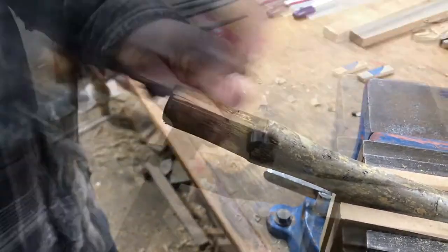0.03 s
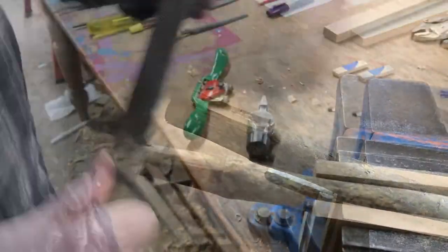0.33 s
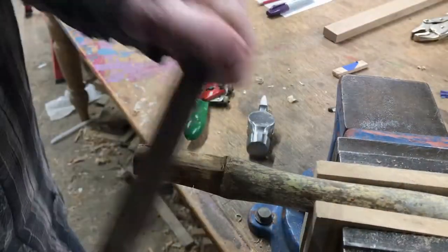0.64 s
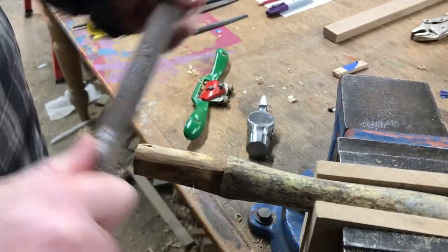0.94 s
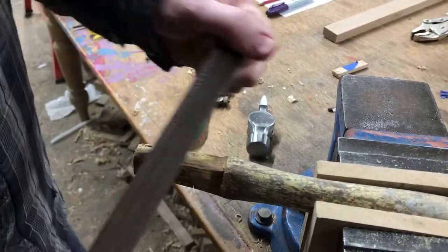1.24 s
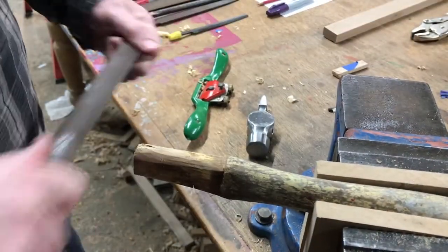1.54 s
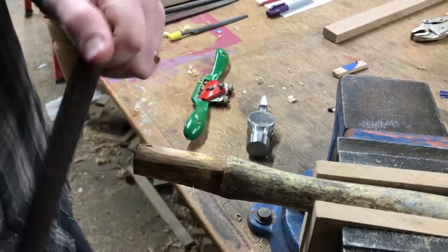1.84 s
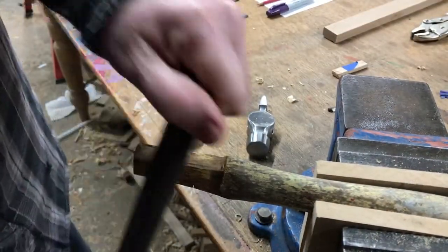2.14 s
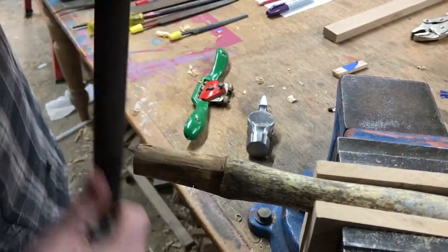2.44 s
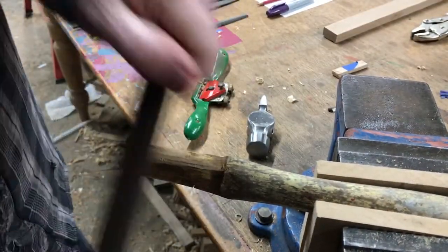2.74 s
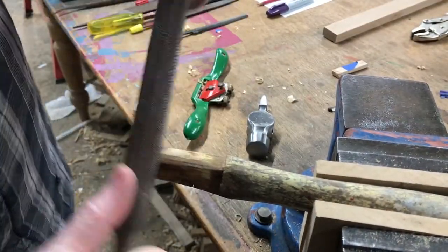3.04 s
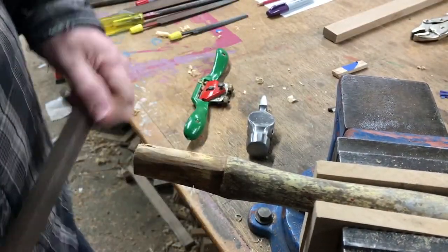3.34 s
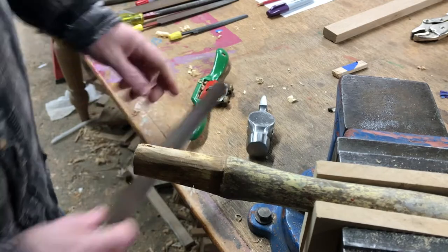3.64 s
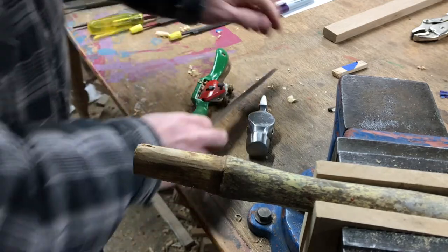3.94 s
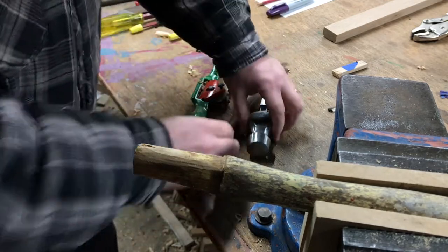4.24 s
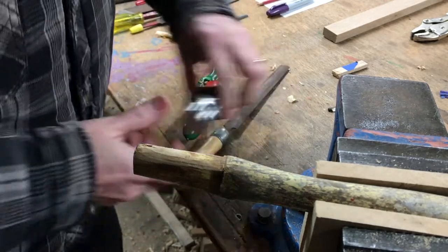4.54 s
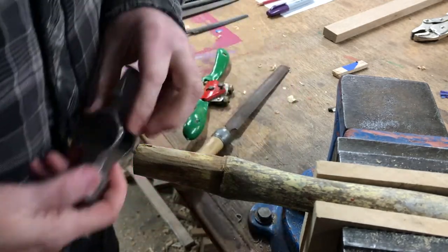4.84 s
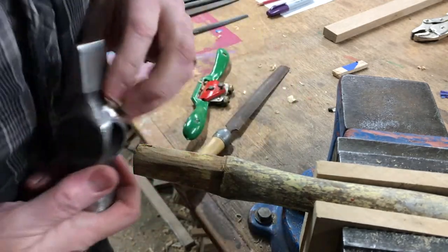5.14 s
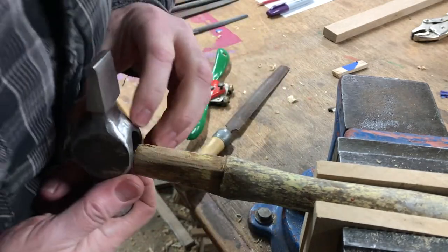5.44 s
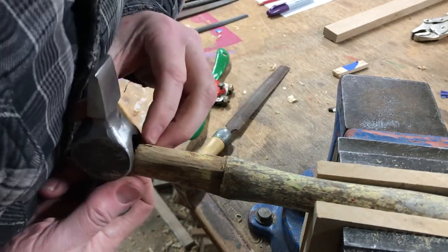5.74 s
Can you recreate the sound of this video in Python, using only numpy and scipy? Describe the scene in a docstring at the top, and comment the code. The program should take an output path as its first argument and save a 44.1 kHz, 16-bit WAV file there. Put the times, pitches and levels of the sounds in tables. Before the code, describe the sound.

A steel file rasps across a wooden hammer handle held in a vise. There are five short, unevenly spaced strokes, each led in by a clack of steel on wood. The file is then dropped on the bench with a brief ringing clatter, a steel hammer head is dragged softly off the wood, and it meets the end of the handle with a hollow tock. Close mono microphone in a small workshop with a low hum.

```python
"""A hand file rasps over a wooden hammer handle in a vise: five strokes, each led in by a clack.
Its rows of teeth tear fibres and shake the wood. Then the file drops on the bench and rings,
and the steel head is dragged off the bench and tried on the handle with a hollow tock.
Small workshop with a low hum; one microphone close to the vise, mono."""
import sys
import numpy as np
from scipy import signal
from scipy.fft import rfft, irfft
from scipy.io import wavfile
from scipy.ndimage import uniform_filter1d

SR = 44100
rng = np.random.default_rng(int(sys.argv[2]) if len(sys.argv) > 2 else 0)


def inscribe(sig):
    """Save sig as 16-bit PCM at rate SR to the path in sys.argv[1].

    A 1-D sig is mono; a 2-D sig holds one channel per row.
    Samples are clipped to [-1, 1] before scaling.
    """
    pcm = np.round(np.clip(np.atleast_2d(sig).T, -1, 1) * 32767)
    wavfile.write(sys.argv[1], SR, pcm.astype(np.int16))


N = 260190
BENDING_HZ, BENDING_WIDTH_HZ, BENDING_T60_S = 360.3, 52, 0.11  # the clamped handle flexing

# The hand's pushes, one or two to a stroke: start_s, attack_s, length_s, hardest_share, level_db,
# swell_db, ease_db, bite_db, chatter_db, bending_db, top_teeth_per_s, fastest_share, spurt_s
# (shares are of length_s)
PUSHES = [ (0.0, 0.01, 0.035, 1, -51, -3, 15, 4.5, 0, -19, 850, 0.56, 0.082),
          (0.088, 0.18, 0.275, 0.77, -50.5, 10.5, 9, 12.5, 8.5, 0, 885, 0.26, 0.155),
          (0.728, 0.0073, 0.19, 0.73, -42.5, 9.5, 11, 14, 9.5, -4.5, 1030, 0.4, 0.062),
          (1.282, 0.006, 0.12, 0.55, -44, 6, 8, 15.5, 5.5, -1, 984, 0.33, 0.12),
          (2.276, 0.11, 0.122, 0.48, -46, 4.5, 6.5, 9.5, 10.5, 5.5, 830, 0.36, 0.12),
          (2.876, 0.098, 0.19, 0.51, -45, 2, 16, 11.5, 7.5, -2, 1010, 0.33, 0.16),
          (3.08, 0.072, 0.02, 0.6, -59, -0.5, -2, 11.5, 2.5, 2.5, 800, 0.5, 0.1), ]
def pushes(slow_teeth_per_s=490):
    """Pressure swells and eases as the hand spurts and slows; gives four gains and the tooth rate."""
    t = np.arange(N) / SR
    gains, teeth_per_s = np.zeros((4, N)), np.zeros(N)
    for (start_s, attack_s, length_s, hardest_share, level_db, swell_db, ease_db,
         bite_db, chatter_db, bending_db, top_teeth_per_s, fastest_share, spurt_s) in PUSHES:
        peak_s = start_s + hardest_share * length_s
        from_peak = np.interp(t, [start_s, peak_s, start_s + length_s], [1, 0, 1])
        pressure_db = -np.where(t < peak_s, swell_db, ease_db) * from_peak ** 0.61  # a sharp peak
        teeth_db = level_db + gate_db(start_s, length_s, attack_s, release_s=0.022)
        # the handle shakes on as the file lifts
        wood_db = level_db + gate_db(start_s, length_s + 0.0074, attack_s, release_s=0.077)
        gains += from_db([teeth_db + pressure_db,
                          teeth_db + bite_db + 1.25 * pressure_db,
                          wood_db + chatter_db + pressure_db,
                          wood_db + bending_db + pressure_db])
        spurt = np.exp(-((t - start_s - fastest_share * length_s) / spurt_s) ** 2)
        speed = slow_teeth_per_s + (top_teeth_per_s - slow_teeth_per_s) * spurt
        teeth_per_s = np.maximum(teeth_per_s, speed)
    return gains, teeth_per_s


# Fibres tearing, heard close up: frequency_hz, density_db
TEARING_SPECTRUM = [(1470, -31.5), (2500, -1), (2960, -10), (3180, -1.5), (4130, 0.5), (4420, -6),
                    (5580, -5), (7030, -12), (8590, -11.5), (9500, -17), (10300, -18), (14300, -10.5),
                    (15800, -22)]
# Narrow peaks in the rasp: pitch_hz, width_hz, level_db
RASP_PEAKS = [(2650, 61, -2.5), (3246, 67, -3.5), (4300, 400, -11), (4740, 180, -1), (5470, 47, 3.5),
              (5860, 43, -3), (6490, 80, -2.5), (7230, 240, -10.5), (9420, 96, -4.5)]
def rasp(tooth_phase):
    """Fibres snap as each row of teeth bites: the bright hiss of the file."""
    tearing = snags(per_s=7800, spread_db=6.5) * (1 + 0.5 * np.sin(tooth_phase))
    hiss = coloured(tearing, TEARING_SPECTRUM)
    peaks = from_db(-0.5) * through(snags(per_s=4500, spread_db=3.5), RASP_PEAKS)
    bright = cut(scattered(hiss + peaks, share_db=-5.5, t60_s=0.0295), 2300, "high", order=3)
    return bright / np.std(cut(bright, 6500, "high", order=6))  # the top treble sets the level


# Low resonances that the teeth set chattering: pitch_hz, width_hz, level_db
CHATTER_MODES = [(650, 100, 0), (722, 70, 2.5), (924, 65, 3)]
# The wood right under the teeth: pitch_hz, width_hz, level_db
BITE_MODES = [(1136, 31, 0.5), (1278, 180, -2.5), (1600, 120, -6), (1850, 63, 1.5), (2076, 210, -3),
              (2395, 60, -2), (2447, 72.6, -9.5)]
def filing():
    """Rows of teeth cross the wood at the hand's speed; they shake the handle and tear fibres."""
    (rasp_gain, bite_gain, chatter_gain, bending_gain), teeth_per_s = pushes()
    tooth_phase = 2 * np.pi * np.cumsum(teeth_per_s * (1 + 0.017 * drift(rate_hz=110))) / SR
    catches = snags(per_s=3000, spread_db=2.5)
    # the handle takes up the beat of the teeth best around one pitch
    beat = from_db(6) * resonate(np.sin(tooth_phase), hz=760, width_hz=420)
    chatter = from_db(-1) * steady(through(catches, CHATTER_MODES) + beat)
    overtone = from_db(-9.5) * np.sin(2 * tooth_phase)
    bite = from_db(-3) * steady(through(catches, BITE_MODES) + overtone)
    sway = from_db(0.5) * steady(resonate_twice(catches, BENDING_HZ, BENDING_WIDTH_HZ))
    # the vise passes the force on to the bench
    shudder = from_db(-14) * steady(cut(resonate(catches, hz=150, width_hz=55), 280, "low"))
    wood = bite_gain * bite + chatter_gain * chatter + bending_gain * (sway + shudder)
    fibres = from_db(0.72) * rasp_gain * rasp(tooth_phase)
    judder = from_db(1.1 * drift(rate_hz=34))  # the file grips and slips
    return judder * (fibres + wood)


# The crack of a hard contact: frequency_hz, density_db
CRACK_SPECTRUM = [(50, -37), (200, -18.5), (700, -15.5), (1400, -1), (3200, 2.5), (6000, 1), (8000, -15),
                  (15000, -17.5)]
# Vise and bench shaken by a blow: frequency_hz, density_db
SHAKE_SPECTRUM = [(50, -26.5), (160, 3), (280, -8.5), (600, 2.5), (950, 2.5), (1400, -3.5), (2000, 1.5),
                  (2700, -21), (6000, -25.5), (15000, -47)]
# The handle struck by the file: pitch_hz, level_db, t60_s
CLACK_MODES = [(500, -31.5, 0.1), (660, -20, 0.1), (852, -22.5, 0.12), (1158.6, -10, .025),
               (1326, -3.5, .022), (1852, -2, 0.0061), (1862, 1, 0.027), (2313, -14, .025),
               (3028, -8, 0.0084), (3530, -7.5, .013), (5600, -2.5, 0.013)]
# The file lands, or its teeth catch mid-stroke, at the vise: start_s, level_db, hardness_hz, grit_db,
# bending_db, shake_db, thud_db
CLACKS = [(0.0358, -17.5, 7100, -8, -42, -19.5, -47), (0.062, -38, 1500, -30, -0.5, -13, -10),
          (0.7193, -15, 5200, -10, -24, -19.5, -31), (1.2707, -14, 2680, -19.5, -26.5, -17.5, -34.5),
          (1.45, -49, 7090, 1.5, -25.5, -9, -25.5), (2.1603, -34, 2610, -6.5, -38, -2.5, -26.5),
          (2.3925, -41.5, 9000, 10, 2.5, 0, -18), (2.805, -19.5, 2710, -16, -34, -13, -24)]
def clacks():
    """Steel lands or catches on the handle: a crack and ringing wood, duller for a softer contact."""
    out, t = np.zeros(N), np.arange(SR // 3) / SR
    for start_s, level_db, hardness_hz, grit_db, bending_db, shake_db, thud_db in CLACKS:
        crack = from_db(-11) * burst(CRACK_SPECTRUM, t, t60_s=0.038)
        wood = cut(struck(CLACK_MODES, t) + crack, hardness_hz, "low", order=3)
        dig = burst(CRACK_SPECTRUM, t, t60_s=0.005)  # the teeth dig in
        grit = from_db(grit_db + 7) * cut(dig, 6000, "high")
        bend = from_db(bending_db) * decay(t, BENDING_T60_S) * np.sin(2 * np.pi * BENDING_HZ * t)
        shake = from_db(shake_db - 3) * burst(SHAKE_SPECTRUM, t, t60_s=0.12)
        bench = rms_one(resonate_twice(rng.standard_normal(len(t)), hz=165, width_hz=33))
        thud = from_db(thud_db) * decay(t, t60_s=0.25) * bench
        add(out, start_s, from_db(level_db) * (wood + grit + bend + shake + thud))
    return out


# The handle struck end on: pitch_hz, level_db, t60_s
END_GRAIN_MODES = [(343, -7, 0.13), (416.4, -3.5, 0.14), (796, -8, .09), (962, -4, 0.21),
                   (1205, -19, 0.051), (1440, -0.5, 0.026), (1825, 5, .04), (2004, -1.5, 0.032),
                   (2370, -7.5, 0.044)]
# The head is tried on the handle: start_s, level_db, hardness_hz
HEAD_TAPS = [(5.2273, -26.5, 3190), (5.2453, -43, 1990)]
def head_taps():
    """The steel head meets the end grain with a hollow tock and bounces once."""
    out, t = np.zeros(N), np.arange(SR // 3) / SR
    for start_s, level_db, hardness_hz in HEAD_TAPS:
        ring = from_db(-4.5) * struck(END_GRAIN_MODES, t)
        crack = from_db(-2) * burst(CRACK_SPECTRUM, t, t60_s=0.013)
        shake = from_db(-11) * burst(SHAKE_SPECTRUM, t, t60_s=0.16)
        add(out, start_s, from_db(level_db) * (cut(ring + crack, hardness_hz, "low") + shake))
    return out


# The bench top: pitch_hz, level_db, t60_s
BENCH_MODES = [(187, -25.5, .35), (357, -24.5, .2), (532, -20.5, .13), (670, -14, 0.085), (850, -5, 0.1),
               (940, -8, .1), (1025, -9, 0.08), (1200, -8, 0.08), (1380, -12, 0.08), (1490, -9.5, 0.09),
               (1786, -8, 0.045), (2266, -14, 0.08), (2444, -9, 0.085), (4371, -18.5, 0.055)]
# The steel file: pitch_hz, level_db, t60_s
FILE_MODES = [(3620, -10, .25), (5200, -3, .14), (6880, -1, .18), (8700, -1, .14), (10750, -11, .11),
              (12800, -8, .11), (14430, -10, .2)]
# Tools and hands on the bench, near the microphone: start_s, level_db, hardness_hz, file_db
BENCH_KNOCKS = [(0.49, -40, 1440, -97.5), (3.974, -63.5, 8960, -71.5), (3.981, -42.5, 925, -63.5),
                (4.023, -43, 600, -86), (4.077, -56.5, 893, -64), (4.151, -27.5, 340, -76.5),
                (4.1674, -21, 3560, -52), (4.1762, -18.5, 1700, -60), (4.201, -27, 1510, -84),
                (4.521, -46, 787, -66), (4.747, -48.5, 800, -89), (4.93, -47, 692, -86.5)]
def bench_knocks():
    """Blows on the bench ring its top and the file; loose things rattle briefly."""
    out, t = np.zeros(N), np.arange(SR // 2) / SR
    for start_s, level_db, hardness_hz, file_db in BENCH_KNOCKS:
        rattle = from_db(-3.5) * burst(CRACK_SPECTRUM, t, t60_s=0.055)
        shake = from_db(-10) * burst(SHAKE_SPECTRUM, t, t60_s=0.17)
        ring = from_db(-2.5) * struck(BENCH_MODES, t)
        top = cut(ring + rattle + shake, hardness_hz, "low", order=3)
        add(out, start_s, from_db(level_db) * top + from_db(file_db) * struck(FILE_MODES, t))
    return out


# Tools in the hands and on the bench, faint even close by: start_s, level_db, pitch_hz, t60_s
TOOL_TICKS = [(0.634, -75.5, 8930, 0.041), (1.753, -63, 3480, 0.045), (1.873, -66, 5930, 0.024),
              (3.825, -68.5, 5100, 0.037), (3.973, -55, 12750, 0.1), (4.022, -54, 6500, 0.052),
              (4.209, -49.5, 4940, 0.065), (4.375, -49.5, 4180, 0.016), (4.748, -69, 3050, 0.038)]
def tool_ticks():
    """Small dry ticks as tools are gripped and shifted."""
    out, t = np.zeros(N), np.arange(SR // 5) / SR
    for start_s, level_db, pitch_hz, t60_s in TOOL_TICKS:
        band = resonate(rng.standard_normal(len(t)), pitch_hz, width_hz=pitch_hz / 2)
        tick = rms_one(cut(band, pitch_hz, "low", order=3))
        add(out, start_s, from_db(level_db) * decay(t, t60_s) * tick)
    return out


# A tool rubbing on wood: frequency_hz, density_db
RUB_SPECTRUM = [(150, -7), (350, 8.5), (600, 0), (1100, -6.5), (2200, -11), (5000, -15), (9000, -42),
                (15000, -33)]
# The file grazes the handle and slides onto the bench; the head is dragged off it and rubbed
# on the handle: start_s, length_s, scrape_db, rumble_db, file_db, grit_db
TOOL_RUBS = [(0.442, 0.008, -66, -90, -95, -64), (3.576, 0.02, -68.5, -86, -95.5, -66),
             (3.979, 0.063, -58.5, -50.5, -67.5, -68), (4.069, 0.07, -59, -65, -74, -78),
             (4.169, 0.04, -54, -57, -87, -93), (4.232, 0.19, -62.5, -50, -104, -109),
             (4.428, 0.063, -68, -50, -88, -85), (4.507, 0.078, -67.5, -72, -98, -88),
             (4.65, 0.21, -73, -65, -86.5, -83), (4.919, 0.049, -84, -57.5, -88.5, -90),
             (5.754, 0.059, -62.5, -66, -98.5, -68)]
def tool_rubs():
    """Tools rub over wood: each rub scrapes, and may set the bench rumbling and the file singing."""
    friction = snags(per_s=1600, spread_db=-4)
    scrape = from_db(2.5) * coloured(friction, RUB_SPECTRUM)
    bench = resonate(friction, hz=184, width_hz=31)
    rumble = from_db(-5) * steady(resonate(bench, hz=140, width_hz=190))
    # under steady rubbing the longest-ringing modes build up the most
    rubbed_modes = [(hz, np.log(1000) / (np.pi * t60_s), db + 20 * np.log10(t60_s))
                    for hz, db, t60_s in FILE_MODES]
    grit = cut(friction, 1900, "high")
    layers = np.array([scrape, rumble, through(friction, rubbed_modes), grit])
    out = np.zeros(N)
    for start_s, length_s, *levels_db in TOOL_RUBS:
        contact = from_db(gate_db(start_s, length_s, attack_s=0.04, release_s=0.13))
        out += contact * (from_db(levels_db) @ layers)
    return out


# The small workshop's reverberation, heard at the bench: frequency_hz, t60_s, level_db
WORKSHOP_REVERB = [(143.3, 0.57, -1.5), (390, 0.33, -5), (900, 0.14, -5.5), (1960, .26, -15),
                   (5000, .24, -22), (14000, 0.15, -30)]
def workshop(x):
    """Quick reflections off the bench, then a diffuse tail that dies sooner in the treble."""
    t = np.arange(SR * 3 // 5) / SR
    hz = np.fft.rfftfreq(len(t), 1 / SR)
    white, tail = rfft(rng.standard_normal(len(t))), 0
    build_up = np.clip(t / 0.02, 0, 1) ** 2
    edges_hz = np.geomspace(80, 18000, 15)
    for low, high in zip(edges_hz, edges_hz[1:]):
        centre_hz = np.sqrt(low * high)
        band = irfft(white * ((hz >= low) & (hz < high)), len(t))
        envelope = build_up * decay(t, at_hz(WORKSHOP_REVERB, centre_hz))
        gain = from_db(at_hz(WORKSHOP_REVERB, centre_hz, column=2))
        tail += gain * band * envelope / np.linalg.norm(envelope)
    return scattered(x, share_db=-12, t60_s=0.06) + signal.fftconvolve(x, tail)[:N]


# The hum at the microphone: time_s, level_db
HUM_LEVELS = [(0.0, -71), (0.06, -66.5), (1.12, -62), (1.15, -55), (1.64, -71.5), (1.94, -55.5),
              (2.61, -67.5), (2.82, -57), (2.91, -63.5), (3.19, -55), (3.29, -67.5), (4.14, -60),
              (4.21, -49), (4.42, -63), (4.91, -56), (5.9, -65)]
def hum(pitch_hz=67, wander_hz=3.9, waver_db=2):
    """A low hum that wavers in level and pitch."""
    level_db = np.interp(np.arange(N) / SR, *np.transpose(HUM_LEVELS)) + waver_db * drift(rate_hz=7)
    phase = 2 * np.pi * np.cumsum(pitch_hz + wander_hz * drift(rate_hz=7)) / SR
    return from_db(level_db) * rms_one(np.sin(phase))


# Room tone of the workshop: frequency_hz, density_db
AIR_SPECTRUM = [(15, -74), (25, -40), (47, -12.5), (70, -17.5), (82, -8.5), (99, -24), (126, -26.5),
                (205, -29.5), (342, -34), (437, -37), (1040, -41), (1780, -44.5), (15800, -53.5)]
def room_tone():
    """Still air: a faint steady noise, mostly bass."""
    air = coloured(rng.standard_normal(N), AIR_SPECTRUM)
    air /= np.std(cut(air, 77, "high", order=8))  # the deepest bass does not count toward the level
    return from_db(-65.5) * cut(air, 140, "high", order=1)


def from_db(db):
    """Decibels to gain."""
    return 10 ** (np.asarray(db) / 20)


def rms_one(x):
    """Scale to unit rms."""
    return x / np.sqrt(np.mean(x ** 2) + 1e-20)


def steady(x):
    """Even out the level over a few hundredths of a second, so that the hand alone sets it."""
    return x / np.sqrt(uniform_filter1d(x ** 2, size=SR // 40) + 1e-9)


def decay(t, t60_s):
    """Fall by 60 dB every t60_s."""
    return from_db(-60 * t / t60_s)


def gate_db(start_s, length_s, attack_s, release_s):
    """Attack from -60 dB up to the start, hold at 0 dB, release."""
    t = np.arange(N) / SR - start_s
    return -60 * (np.maximum(-t, 0) / attack_s + np.maximum(t - length_s, 0) / release_s)


def at_hz(points, hz, column=1):
    """Read a column of a table on a log-frequency axis."""
    table = np.array(points)
    return np.interp(np.log(np.maximum(hz, 1)), np.log(table[:, 0]), table[:, column])


def coloured(x, spectrum):
    """Give a steady sound a spectrum; rms 1."""
    gain = from_db(at_hz(spectrum, np.fft.rfftfreq(len(x), 1 / SR)))
    return rms_one(irfft(rfft(x) * gain, len(x)))


def cut(x, hz, kind, order=2):
    """Butterworth low- or high-pass."""
    return signal.sosfilt(signal.butter(order, hz, kind, fs=SR, output="sos"), x + 1e-18)


def resonate(x, hz, width_hz):
    """One resonance with gain 1 on top."""
    radius = np.exp(-np.pi * width_hz / SR)
    poles = [1, -2 * radius * np.cos(2 * np.pi * hz / SR), radius ** 2]
    return signal.lfilter(np.array([1, 0, -1]) * (1 - radius ** 2) / 2, poles, x)


def resonate_twice(x, hz, width_hz):
    """The same resonance twice in series, for steeper sides."""
    return resonate(resonate(x, hz, width_hz), hz, width_hz)


def through(x, resonances):
    """Resonances in parallel, signs alternating; rms 1."""
    return rms_one(sum((-1) ** k * from_db(db) * resonate(x, hz, width_hz)
                       for k, (hz, width_hz, db) in enumerate(resonances)))


def struck(modes, t):
    """Decaying sines of alternating sign; each blow excites them a little differently."""
    hz, db, t60_s = np.transpose(modes)[:, :, None]
    sign = (-1) ** np.arange(len(modes))[:, None]
    strength = sign * from_db(db + rng.standard_normal(db.shape))
    return np.sum(strength * decay(t, t60_s) * np.sin(2 * np.pi * hz * t), axis=0)


def burst(spectrum, t, t60_s):
    """Coloured noise that starts at rms 1 and dies away."""
    return coloured(rng.standard_normal(len(t)), spectrum) * decay(t, t60_s)


def snags(per_s, spread_db):
    """Fibres catch and snap: dense clicks of uneven size."""
    sizes = from_db(spread_db * np.minimum(rng.exponential(1, N), 4)) * rng.choice([-1, 1], N)
    return rms_one(sizes * (rng.random(N) < per_s / SR))


def drift(rate_hz):
    """Slow random wavering of spread 1."""
    hz = np.fft.rfftfreq(N, 1 / SR)
    return rms_one(irfft(rfft(rng.standard_normal(N)) / (1 + (hz / rate_hz) ** 4), N))


def scattered(x, share_db, t60_s):
    """Dense quick reflections, which ripple the spectrum."""
    t = np.arange(SR // 10) / SR
    echoes = rng.standard_normal(len(t)) * decay(t, t60_s) * (t > 0.002)
    return x + from_db(share_db) * signal.fftconvolve(x, echoes / np.linalg.norm(echoes))[:N]


def add(out, start_s, sound):
    """Mix a sound in at a time."""
    start = round(start_s * SR)
    out[start:start + len(sound)] += sound[:N - start]


def scene():
    """The bench work and the room at one close microphone, alike in both channels."""
    bench_work = filing() + clacks() + head_taps() + bench_knocks() + tool_ticks() + tool_rubs()
    mono = workshop(bench_work) + hum() + room_tone()
    return np.array([mono, mono])


def record(dry):
    """The microphone's signal is cut steeply at the top of the treble."""
    cutoff_hz = 15900
    return signal.sosfilt(signal.ellip(10, 0.2, 80, cutoff_hz, fs=SR, output="sos"), dry)


dry = scene()
out = record(dry)
inscribe(out)
```